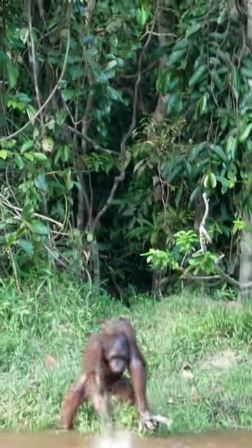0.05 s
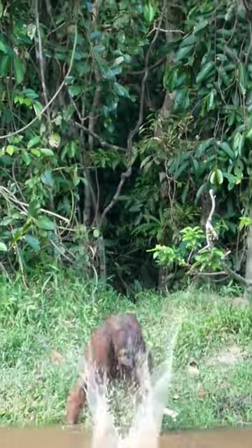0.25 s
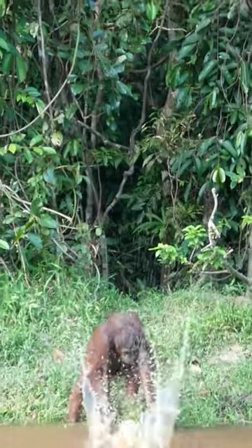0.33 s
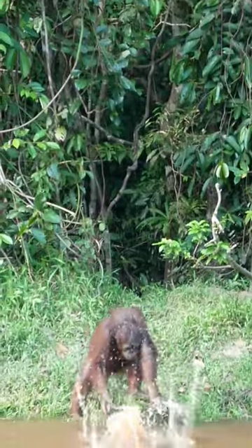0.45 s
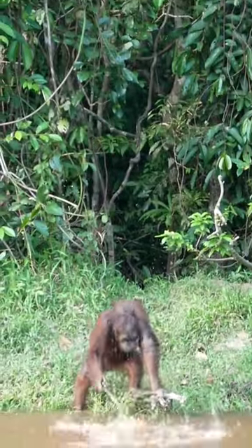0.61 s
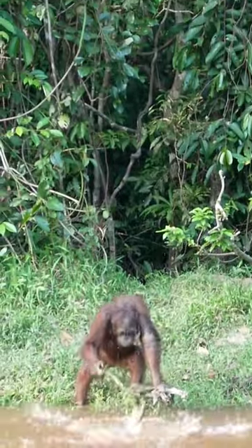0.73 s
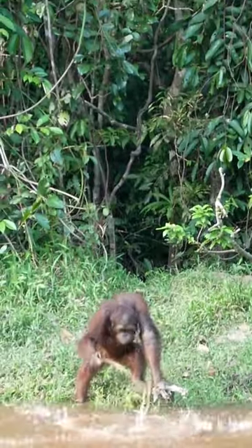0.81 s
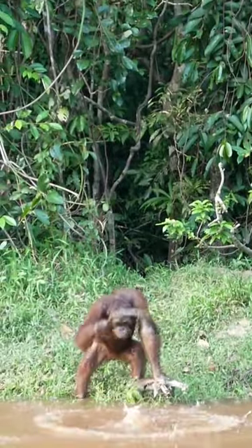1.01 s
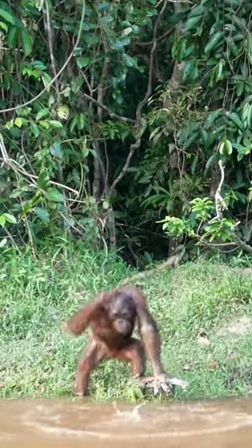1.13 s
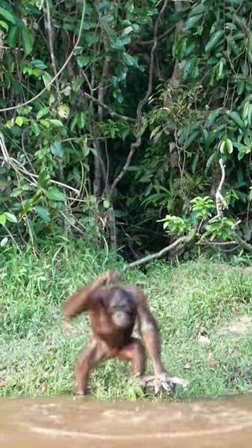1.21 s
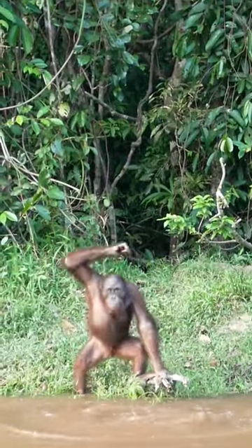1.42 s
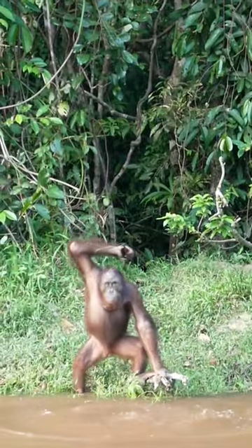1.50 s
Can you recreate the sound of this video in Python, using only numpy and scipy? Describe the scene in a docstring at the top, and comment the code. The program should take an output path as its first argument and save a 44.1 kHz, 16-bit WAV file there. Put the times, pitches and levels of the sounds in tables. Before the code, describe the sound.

A stick smacks river water with a sharp splash, and drops patter back down.

```python
"""A stick smacks a river from the bank: a sharp crack, a hiss of spray, and a plop as the cavity closes.
The thrown water falls back as a patter of drops and thins out to a few drips; the air it traps
rings as bubbles, each a mass of water on a spring of air, rising in pitch as it nears the surface.
Wavelets lap softly, and insects shrill in the forest over a low rumble.
A hard surface near the listener adds one quick reflection to the sounds of the water."""
import sys
import numpy as np
from scipy import signal
from scipy.fft import rfft, irfft, next_fast_len
from scipy.io import wavfile
from scipy.ndimage import map_coordinates

SR = 44100
rng = np.random.default_rng(int(sys.argv[2]) if len(sys.argv) > 2 else 0)


def inscribe(sig):
    """Save sig as 16-bit PCM at rate SR to the path in sys.argv[1].

    A 1-D sig is mono; a 2-D sig holds one channel per row.
    Samples are clipped to [-1, 1] before scaling.
    """
    pcm = np.round(np.clip(np.atleast_2d(sig).T, -1, 1) * 32767)
    wavfile.write(sys.argv[1], SR, pcm.astype(np.int16))


N = 68355
T = np.arange(N) / SR
START_S, CRACK_S = 0.2049, 0.2448


def amp(db):
    """Decibels as an amplitude ratio."""
    return 10 ** (np.asarray(db) / 20)


def unit(x):
    """Normalisation to rms 1."""
    return x / np.sqrt(np.mean(x ** 2) + 1e-20)


def gain(spectrum, hz):
    """Amplitude response: levels in dB interpolated over log frequency."""
    frequency_hz, level_db = np.transpose(spectrum)
    return amp(np.interp(np.log(hz + 1), np.log(frequency_hz + 1), level_db))


def filtered(x, response):
    """Linear filtering: the spectrum of x times a frequency response."""
    size = next_fast_len(N + SR // 2)
    return irfft(rfft(x, size) * response(np.fft.rfftfreq(size, 1 / SR)), size)[..., :N]


def coloured(x, spectrum):
    """Spectral shaping of x, at rms 1."""
    return unit(filtered(x, lambda hz: gain(spectrum, hz)))


def noise(spectrum):
    """Coloured Gaussian noise of rms 1."""
    return coloured(rng.standard_normal(N), spectrum)


def wobble(per_s):
    """Random modulation: a smooth curve through random knots."""
    return map_coordinates(rng.standard_normal(int(N * per_s / SR) + 4), [T * per_s])


def fade(start_s, t60_s, attack_s):
    """Exponential rise, then exponential decay of 60 dB in t60_s."""
    t = np.maximum(T - start_s, 0)
    return (1 - np.exp(-t / attack_s)) * np.exp(-np.log(1000) * t / t60_s)


def tone(start_s, hz, t60_s, attack_s, rise=0):
    """A damped oscillator whose pitch climbs by the share rise per decay time."""
    t = np.maximum(T - start_s, 0)
    return fade(start_s, t60_s, attack_s) * np.sin(2 * np.pi * hz * t * (1 + rise * t / t60_s / 2))


def forest():
    """Incoherent sources sum to noise: an insect chorus ahead, a low rumble and faint open air."""
    # spectra of the background: frequency_hz, level_db
    chorus_spectrum = [(3000, -22.5), (5200, -17.5), (5750, -19.5), (6050, -4), (6400, 0), (6850, 3),
                       (7250, -3), (7650, -11), (7850, -8.5), (8050, -8), (8400, -13.5), (9300, -23.5),
                       (12000, -35.5), (15000, -32)]
    rumble_spectrum = [(25, -24), (48, -21), (70, -7), (90, -5.5), (120, -2), (160, 0), (220, -5),
                       (350, -15), (600, -17.5), (1500, -67), (5000, -80)]
    air_spectrum = [(100, -1), (600, 6), (1100, 7.5), (2200, -2.5), (4000, -7), (5500, -45), (9000, -51),
                    (15000, -49)]
    side_air_spectrum = [(60, -16), (160, -8), (300, 9), (600, 6), (1200, 0.5), (2400, -8.5), (4200, -17.5),
                         (5200, -57), (14000, -63)]
    antiphase = np.array([[1], [-1]])
    insects = amp(-45.5 + 1.1 * wobble(13.5) + 0.95 * wobble(150)) * noise(chorus_spectrum)
    rumble_level = amp(-49.5 + 1.1 * wobble(30.06))
    rumble = unit(noise(rumble_spectrum) + amp(-6) * noise(rumble_spectrum) * antiphase)
    air = amp(-56) * noise(air_spectrum) + amp(-51) * noise(side_air_spectrum) * antiphase
    return insects + rumble_level * rumble + air


def stick_impact(crack_db=-7, crack_hz=2440):
    """Impact: the stick cuts in, then slaps flat with one swing of pressure and a brief ringing."""
    # contacts along the stick's length: start_s, level_db, t60_s
    contacts = [(.2384, -21.5, 0.021), (0.2427, -19.5, 0.011)]
    # spectrum of the stick cutting in: frequency_hz, level_db
    entry_spectrum = [(60, -43), (200, -21), (300, -22), (430, -16), (760, 9), (1150, -5.5), (2000, 3.5),
                      (3300, 0.5), (4700, -5.5), (5600, -30), (7400, -4.5), (11000, -15), (14500, -46)]
    # ringing of the stick's own wooden modes after the crack: pitch_hz, level_db, t60_s
    slap_resonances = [(316, -27.5, 0.049), (759, -26.5, 0.095), (1540, -26, 0.02), (1950, -18, 0.0072),
                       (2510, -22.5, 0.01), (3240, -18, 0.021), (4360, -19, 0.0066), (4670, -22, 0.011)]
    entry = noise(entry_spectrum) * sum(amp(db) * fade(s, t60, 0.00029) for s, db, t60 in contacts)
    pulse_time = 2 * np.pi * crack_hz * (T - CRACK_S)
    crack = amp(crack_db) * pulse_time * np.exp((1 - pulse_time ** 2) / 2)
    ring = sum(amp(db) * tone(CRACK_S, hz, t60, attack_s=0.0001) for hz, db, t60 in slap_resonances)
    return entry + crack + ring


def drop_cluster(start_s, t60_s, centre_hz, width_octaves=0.41, grain_db=3):
    """Closely spaced drop impacts merge into a grainy, decaying band of noise."""
    band = lambda hz: (1 + (np.log2((hz + 1) / centre_hz) / width_octaves) ** 2) ** -2
    grains = rng.standard_normal(N) * amp(grain_db * wobble(500))
    return unit(filtered(grains, band)) * fade(start_s, t60_s, 0.00037)


def spray():
    """Water breaking up radiates broadband noise: a first burst, a rising sheet and fine mist."""
    # spectra of the thrown water: frequency_hz, level_db
    burst_spectrum = [(100, -7), (300, -4), (450, 0), (800, 16.5), (1150, -7), (2000, -3), (3300, -3),
                      (4700, 2), (5600, -19), (7400, -8), (11000, -24), (14500, -44)]
    sheet_spectrum = [(100, -31), (400, 8.5), (1100, 8), (2000, 12.5), (2800, 7), (3300, 11.5), (3800, 6),
                      (4500, 9.5), (5700, 2.5), (7500, -18), (10500, -6), (14500, -44)]
    burst = amp(-29.5) * noise(burst_spectrum) * fade(CRACK_S, t60_s=0.093, attack_s=0.0012)
    sheet = amp(-40 + 0.41 * wobble(81)) * noise(sheet_spectrum)
    sheet *= fade(CRACK_S, t60_s=0.68, attack_s=0.003)
    mist = amp(-51) * drop_cluster(CRACK_S, t60_s=0.43, centre_hz=8700)
    return burst + sheet + mist


def swarm(per_s, centre_hz, t60_cycles, spread_octaves, rise):
    """Superposed bubble resonances of random pitch, life, strength and onset, at rms 1."""
    draws = np.random.default_rng(rng.integers(2 ** 31)).random((int(per_s * N / SR), 5))
    radius, angle, life, strength, onset = draws.T[:, :, None]
    gaussian = np.sqrt(-2 * np.log(1 - radius)) * np.cos(2 * np.pi * angle)
    hz = np.minimum(centre_hz * 2 ** (spread_octaves * gaussian), SR / 3)
    samples = np.arange(SR // 40)
    cycles = hz * samples / SR
    age = cycles / (t60_cycles * 2 ** (2 * life - 1))  # in decay times
    level_db = np.minimum(-np.log(1 - strength), np.pi)
    phase = 2 * np.pi * cycles * (1 + rise * np.minimum(age, 2) / 2)
    rings = amp(level_db) * np.exp(-np.log(1000) * age) * np.sin(phase)
    positions = (onset * N).astype(int) + samples
    return unit(np.bincount(positions.ravel(), rings.ravel(), N)[:N])


def falling_water(patter_gain_db=1, slosh_gain_db=-1.5):
    """Air entrainment: small drops patter over foam, and larger bubbles gurgle in churning water."""
    # contour of the fall, before the gains: time_s, patter_db, slosh_db
    contour = [(.26, -58.5, -59), (0.348, -46.5, -44), (.49, -58, -54.5), (.55, -49.5, -48.5),
               (.6, -45, -46), (.71, -44.5, -51.5), (.77, -43, -52), (.8, -40.5, -44), (.88, -43, -47.5),
               (.97, -45.5, -44.5), (1.03, -48, -48.5), (1.11, -49, -51), (1.2, -54.5, -49.5),
               (1.31, -54.5, -56), (1.55, -62.5, -58)]
    # spectra of the small drops and the churning water: frequency_hz, level_db
    patter_spectrum = [(100, -11), (500, -1), (1100, -3.5), (2200, 1), (3800, 1), (5000, -5.5),
                       (7000, -2.5), (9000, -12), (11000, -21.5), (14500, -45)]
    slosh_spectrum = [(80, -26), (280, 2), (410, -4), (600, 8), (950, 2), (1400, 2), (3000, -30),
                      (8000, -58)]
    time_s, patter_db, slosh_db = np.transpose(contour)
    drops = swarm(per_s=1700, centre_hz=2532, t60_cycles=25, spread_octaves=0.85, rise=0.045)
    foam = amp(-1.5 + 2 * wobble(290)) * noise(patter_spectrum)
    patter = unit(coloured(drops, patter_spectrum) + foam)
    gurgles = swarm(per_s=320, centre_hz=630, t60_cycles=29, spread_octaves=0.497, rise=0.25)
    churn = amp(-1.5) * noise(slosh_spectrum)
    slosh = unit(coloured(gurgles, slosh_spectrum) + churn)
    patter *= amp(patter_gain_db + np.interp(T, time_s, patter_db) + wobble(44.04))
    slosh *= amp(slosh_gain_db + np.interp(T, time_s, slosh_db))
    return patter + slosh


def splats():
    """Impact noise: lumps of water slap the surface, each a cluster of drops."""
    # landings: start_s, level_db, t60_s, centre_hz
    landings = [(0.324, -32.5, 0.016, 3120), (.574, -40, .03, 1900), (.5858, -27.5, 0.011, 2410),
                (.611, -32, 0.0086, 4120), (.671, -37, 0.024, 2600), (0.807, -35.5, 0.028, 3970),
                (0.792, -36, 0.046, 2700), (0.827, -33.5, 0.024, 3000), (0.8837, -31.5, .012, 3000),
                (0.908, -38, 0.04, 3950), (0.995, -35.5, 0.043, 2000), (1.074, -41, 0.018, 8300),
                (1.094, -40.5, .04, 2370), (1.142, -46, 0.028, 3670), (1.125, -45, 0.032, 2100),
                (1.334, -43.5, 0.034, 3800), (1.342, -42, 0.064, 2250), (1.368, -38, 0.017, 5000)]
    return sum(amp(db) * drop_cluster(s, t60, hz) for s, db, t60, hz in landings)


def plops(attack_s=0.0007):
    """Bubble resonance: air trapped by the closing cavity and by drops rings with a rising pitch."""
    # large air pockets: start_s, pitch_hz, level_db, t60_s, rise_per_t60
    pockets = [(.3378, 599, -21, 0.029, 0.061), (.3385, 274, -23, 0.035, 0.087),
               (.339, 1850, -26, 0.0087, .05), (.5862, 570, -25.5, 0.039, .1),
               (.5875, 740, -30.5, 0.044, 0.11), (0.599, 1000, -35, 0.041, .1),
               (0.647, 1300, -30, 0.014, 0.17), (.6425, 1810, -30.5, 0.04, .03),
               (.661, 730, -34, 0.081, 0.075), (.742, 1410, -34, 0.017, 0.056),
               (.748, 1980, -31.5, 0.021, .05), (.75, 620, -30.5, 0.026, 0.056),
               (.788, 1418, -36, 0.048, 0.03), (.8535, 875, -26, 0.025, .15),
               (.863, 975, -28, 0.033, 0.077), (.87, 2000, -31.5, .02, .1), (.898, 292.5, -36, 0.12, 0.11),
               (.939, 567, -33, 0.032, 0.072), (.996, 1904, -38, .025, .05), (1, 2400, -38.5, .03, .05),
               (1.007, 1464, -33.5, 0.019, .05), (1.082, 2110, -37, 0.04, .05),
               (1.123, 1980, -37.5, 0.029, 0.08), (1.131, 1850, -37, 0.022, .05),
               (1.195, 1880, -36, 0.019, .05), (1.343, 2020, -39, 0.018, .05)]
    return sum(amp(db) * tone(s, hz, t60, attack_s, rise) for s, hz, db, t60, rise in pockets)


def laps():
    """Damped low oscillations: dull knocks, as of wavelets lapping nearby."""
    # knocks: start_s, pitch_hz, level_db
    knocks = [(0.452, 88, -43), (0.487, 153, -35), (0.571, 92, -38.5), (0.804, 71.4, -43),
              (1.032, 164, -39.5), (1.11, 155, -44), (1.274, 175, -34.5), (1.436, 156.7, -37.5),
              (1.516, 157, -62)]
    return sum(amp(db) * tone(s, hz, t60_s=0.097, attack_s=0.0018) for s, hz, db in knocks)


def surroundings(x, echo_s=0.00204, echo_gain=0.42, crossfade_s=0.1):
    """One reflection makes a comb filter, and a short diffuse scatter surrounds the splash."""
    # response of the scatter: frequency_hz, gain_db
    scatter_response = [(60, -12), (280, -10), (600, -13.5), (1200, -10), (2400, -12.5), (3800, -17.5),
                        (5200, -51), (12000, -44)]
    near = filtered(x, lambda hz: 1 + echo_gain * np.exp(-2j * np.pi * hz * echo_s))
    # overlapping triangular windows, each with fresh random tails so that no pitch keeps ringing
    centres = np.arange(int(N / SR / crossfade_s) + 2)[:, None]
    windows = np.maximum(0, 1 - np.abs(T / crossfade_s - centres))
    decay = fade(echo_s, t60_s=0.07, attack_s=0.0012)[:SR // 10]
    tails = rng.standard_normal((2, len(windows), len(decay))) * decay / np.linalg.norm(decay)
    diffuse = signal.fftconvolve((x * windows)[None], tails, axes=2).sum(axis=1)[:, :N]
    mid, side = filtered(diffuse, lambda hz: gain(scatter_response, hz))
    return near + 0.6 * mid + np.array([side, -side])


def scene():
    """Superposition: the splash and its reflections add to the steady forest."""
    low_cut = signal.butter(2, 120, "high", fs=SR, output="sos")
    smack = signal.sosfilt(low_cut, stick_impact() + spray())
    return surroundings(smack + splats() + plops() + falling_water() + laps()) + forest()


def record(dry, top_hz=15100):
    """The microphone as a band-limited linear filter, with a quick fade-in at START_S."""
    # microphone response: frequency_hz, gain_db
    mic_response = [(25, -12), (48, -10.5), (72, -0.5), (310, 1), (400, -1.5), (540, -1.5), (2050, -1.5),
                    (2210, -1), (2370, -1), (12500, -0.5), (14000, -3), (15000, -20)]
    fade_in = np.clip((T - START_S) / 0.0028, 0, 1)
    gated = filtered(dry, lambda hz: gain(mic_response, hz)) * fade_in
    return filtered(gated, lambda hz: hz < top_hz)


dry = scene()
out = record(dry)
inscribe(out)
```